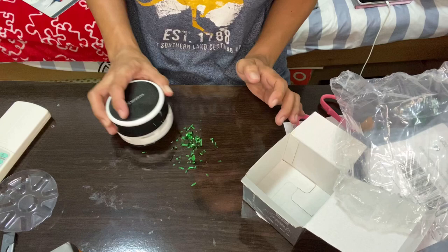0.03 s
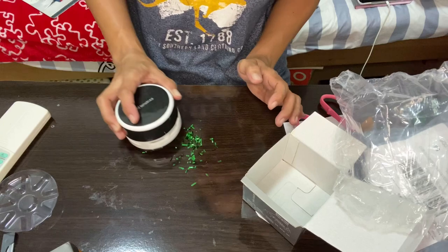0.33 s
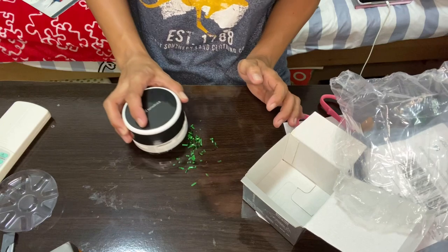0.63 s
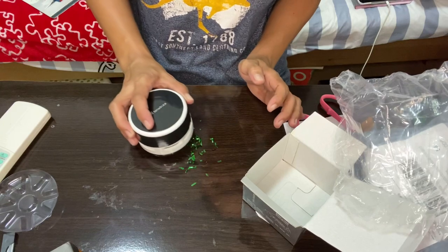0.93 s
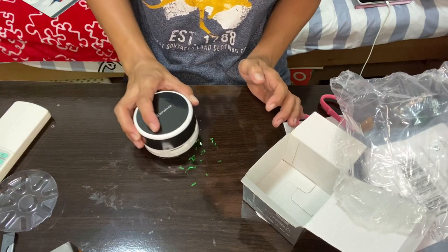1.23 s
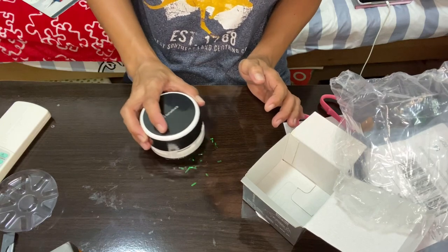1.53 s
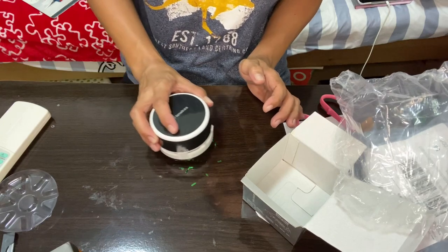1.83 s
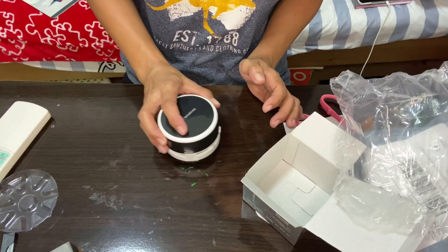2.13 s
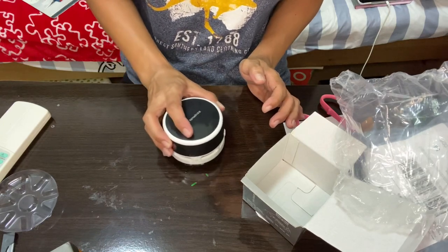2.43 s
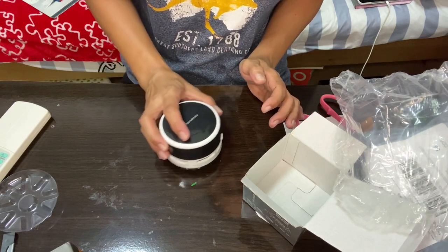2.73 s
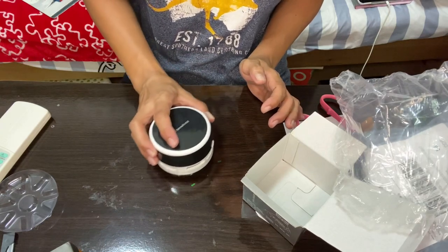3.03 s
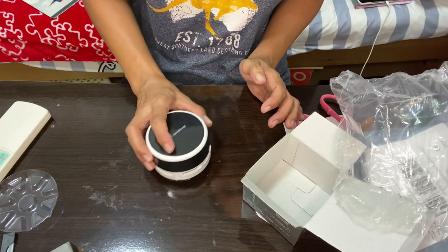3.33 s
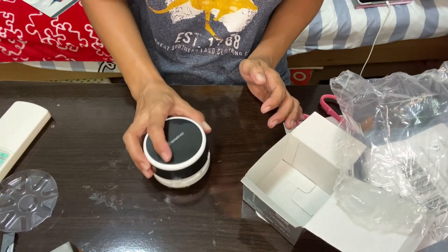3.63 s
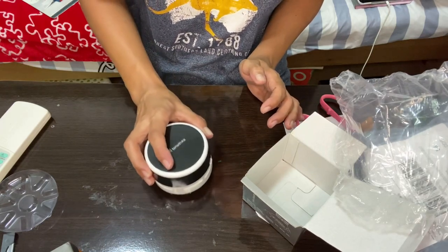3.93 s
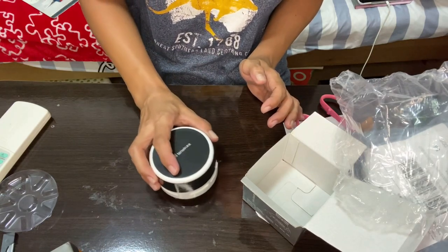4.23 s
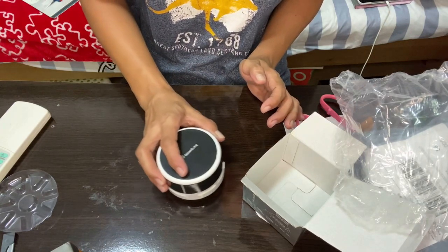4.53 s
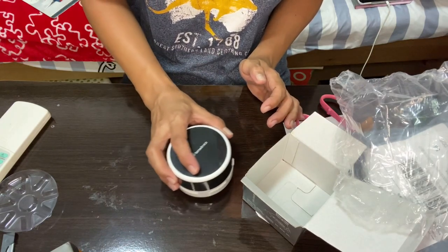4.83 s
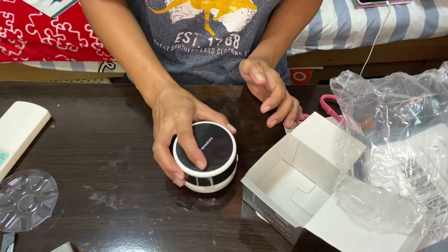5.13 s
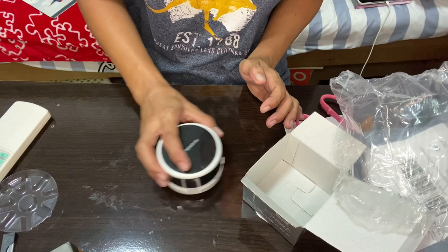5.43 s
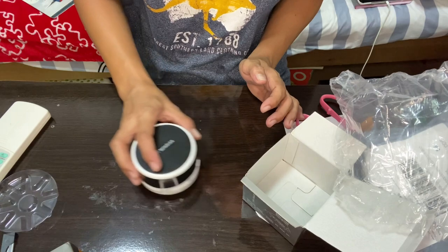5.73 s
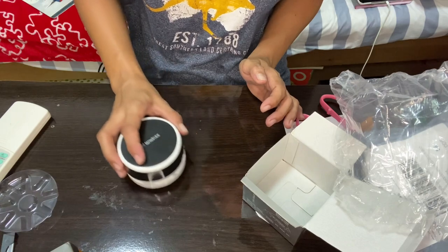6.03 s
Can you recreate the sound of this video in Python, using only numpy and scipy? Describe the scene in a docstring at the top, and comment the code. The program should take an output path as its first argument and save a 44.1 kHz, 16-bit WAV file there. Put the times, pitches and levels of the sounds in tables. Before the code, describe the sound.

A small handheld vacuum hums and whirs steadily across a tabletop, with scraps ticking inside and its rim lightly scuffing and knocking.

```python
"""A desk vacuum on a wooden table

A palm-sized vacuum cleaner spins up and is pushed over a table, close to a phone.
Its six-blade fan hums and blows air through a plastic shell while the motor brushes buzz.
The rim scuffs and knocks on the table, and scraps rattle up the intake and tick against the dust cup.
At the very end the cleaner gives a low groan."""
import sys
import numpy as np
from scipy import signal
from scipy.fft import rfft, irfft, next_fast_len
from scipy.io import wavfile
from scipy.ndimage import map_coordinates

SR = 44100
rng = np.random.default_rng(int(sys.argv[2]) if len(sys.argv) > 2 else 0)


def wav_out(sig):
    """Save sig, one row per channel (or a flat mono array), as 16-bit PCM at SR to the path in sys.argv[1]."""
    wavfile.write(sys.argv[1], SR, np.round(np.clip(np.atleast_2d(sig).T, -1, 1) * 32767).astype(np.int16))


N = 268216
T = np.arange(N) / SR
TOP_HZ = 9600  # the highest pitch the phone picks up
PUSH_START_S, PUSH_M_PER_S = .5, .0336  # the hand pushes at a steady speed

# All levels in the tables are relative: the functions turn them up or down in the mix.
# The cleaner coming on. Each row: time in seconds, level in dB.
SPIN_UP = [(.034, -73), (.037, -10), (.075, -1.5), (.115, 3), (.15, 5.5)]
# The fan's tones; number 6 is the blade tone. Each row: multiple of the shaft speed, level in dB.
FAN_TONES = [(3, -23.5), (5, -23.5), (6, 0), (9, -16), (12, -24)]
# The blade tone shifts sideways as the cleaner moves. Each row: time in seconds, left minus right in dB.
BLADE_PAN = [(.15, 5), (1.2, 1.3), (2.2, 1), (2.8, 3), (4.8, -3.5), (5.3, -1), (6, 0.5)]
# The buzz of the motor brushes. Each row: pitch in Hz, level in dB of the tones near it.
BRUSH_BUZZ = [(2600, -72), (4000, -78), (5500, -73), (6600, -75.5), (7300, -103), (8300, -103),
              (8800, -79.5), (9400, -78.5)]
# The unbalanced rotor thrums through the table. Each row: time in seconds, level in dB.
THRUM = [(0.1, -65.5), (0.45, -62), (1.24, -85), (1.31, -66), (1.43, -74.5), (2.5, -60), (2.58, -76),
         (2.82, -64.5), (3.41, -75.5), (4.87, -74), (5.04, -62), (5.34, -87), (5.73, -69.5), (6.05, -65)]
# The whine's thin tones. Each row: multiple of the shaft speed (rounded when used), top level in dB,
# time of the swell in seconds, its width in seconds, dB lost away from the swell.
WHINE_TONES = [(31, -65, 3.7, .7, 8), (33, -69.5, 1.5, 1.8, 8.5), (42, -64, 1.3, 0.93, 10.5),
               (43, -66, 4.9, .45, 12.5), (46, -61, 1.95, .5, 12.5), (48, -66, 2.6, 2, 6.5),
               (49, -66.5, 4, 1.9, 6), (54, -62, 2, 1, 5.5), (55, -62.5, 4.85, .52, 14),
               (56, -60, 4.97, .5, 14), (58, -63, 3.4, .5, 9), (60, -66, 3.9, 0.92, 10.5),
               (61, -61.5, 4.25, .35, 11.5), (62, -65.5, 4.6, .35, 8.5), (63, -61.5, 5.5, .4, 7.5),
               (69.1, -68, 4.8, 1.4, 10.5)]
# Swirling air in the fan. Each row: frequency in Hz, level in dB.
AIR_COLOUR = [(15, -31.5), (28, -25.5), (60, -29), (130, -35), (165, -26.5), (205, -11.5), (300, -4),
              (430, -1.6), (620, -0.5), (950, -7.5), (1250, -9.5), (1900, -14), (3500, -16.5), (4600, -24),
              (6200, -25.5), (9500, -36)]
# Peaks and dips of the shell and its vents. Each row: centre in Hz, width in Hz, boost or cut in dB.
SHELL_PEAKS = [(400.5, 19.6, 4.5), (516, 63, -0.5), (632, 27, -4.5), (750, 173, 4), (1120, 50, 2),
               (1200, 63, -1.5), (1455, 138, 2), (1704, 180, 3), (1880, 88, -5), (2200, 166, 2),
               (2600, 130, -3.5), (2780, 130, 3.5), (3525, 150, 3), (3700, 84, -2.5), (4250, 110, 3),
               (4580, 330, -3.5)]
# Scraps rattle most as the rim meets the pile. Each row: time in seconds, level in dB.
RATTLE_LEVEL = [(.58, -58.5), (.76, -53.5), (1.3, -52.5), (1.9, -54.5), (3.2, -57.5), (4.6, -65.5),
                (6.05, -63)]
# Hard plastic being scratched. Each row: frequency in Hz, level in dB.
PLASTIC_COLOUR = [(300, -21.5), (1200, 3.5), (2300, 4), (3600, 2.5), (6000, 3), (8500, -0.5), (10000, -8)]
# Larger scraps hit the cup. Each row: start in seconds, level in dB, pitch of the struck spot in Hz,
# seconds to fade by 60 dB.
TICKS = [(.4313, -35.5, 6000, .014), (.564, -37, 6500, .022), (.652, -39, 8000, .025),
         (.736, -36, 4000, 0.022), (.826, -38, 4000, .025), (.8365, -38, 4000, .02), (.89, -40, 5300, .015),
         (.9115, -37, 3000, .015), (1.124, -35, 7000, .025), (1.1715, -33.5, 3300, 0.032),
         (1.193, -31, 7300, .018), (1.272, -38, 3500, .02), (1.28, -34.5, 6300, .02),
         (1.36, -34, 5500, .02), (1.371, -35, 3400, .025), (1.5988, -36, 4400, .018),
         (1.653, -34.5, 5500, .02), (1.659, -37, 3500, .025), (1.775, -37, 4000, .018),
         (1.786, -32, 5500, .02), (1.9505, -40, 4200, .018), (1.955, -33.5, 5600, .018),
         (2.3255, -40, 5700, .015), (2.4396, -28.5, 4300, 0.0099), (2.477, -36, 4000, .018),
         (2.538, -40, 9000, .025), (2.5855, -37, 3200, .02), (2.601, -34, 5400, .022),
         (2.767, -34, 5530, .04), (2.8325, -35, 6800, .014), (2.85, -40, 5400, .03),
         (2.957, -34.5, 4000, .016), (3.132, -39, 2300, .015), (3.1435, -35, 4500, .025),
         (3.1665, -36, 4300, .016), (3.319, -39, 2400, .015), (3.46, -36, 4000, .015),
         (3.586, -38, 6000, .016), (3.653, -31, 6000, .022), (4.246, -38, 4800, .015),
         (5.1955, -36, 4400, .022), (5.8845, -36, 3500, 0.02), (5.965, -35.5, 3000, .02),
         (5.991, -37, 3000, .018)]
# The rim's firmest scuffs. Each row: middle in seconds, half-length in seconds, hiss in dB, cup in dB.
FIRM_SCUFFS = [(.145, 0.03, -49.5, -55), (.326, .038, -45, -48), (.68, 0.046, -43.5, -48),
               (.837, .04, -38.5, -36), (.903, 0.028, -42.5, -37), (1.15, 0.05, -46, -53),
               (1.26, 0.063, -41, -48), (1.362, 0.045, -38.5, -35), (1.789, 0.081, -42, -42),
               (2.06, .025, -50, -36), (2.16, 0.049, -47, -36), (2.585, 0.021, -43, -35),
               (2.852, 0.017, -46, -34), (3.115, .025, -52, -38), (3.16, 0.035, -41, -41),
               (3.62, 0.15, -50.5, -51), (4.17, .1, -48.5, -65), (4.245, 0.009, -56, -51),
               (4.42, .018, -42, -41), (5.975, .038, -48, -48)]
# The hollow cup during a scuff. Each row: frequency in Hz, level in dB.
CUP_COLOUR = [(100, -30), (350, -13.5), (700, 8.5), (1000, -2), (1500, -12.5), (2400, -20), (4000, -32.5)]
# The rim judders on the table. Each row: start in seconds, level in dB, favoured pitch in Hz.
KNOCKS = [(.7095, -26.5, 1050), (.741, -28, 740), (.825, -26, 1080), (.892, -26, 800), (.908, -25.5, 1080),
          (1.2355, -24, 720), (1.3295, -26, 1080), (1.346, -31, 700), (1.3605, -25, 720), (1.871, -25, 790),
          (2.1445, -24, 715), (2.168, -27, 715), (2.2645, -29, 790), (2.5715, -26.5, 720),
          (3.5675, -24, 790), (3.638, -24, 680), (5.462, -27, 1000)]
# The notes the cup rings at. Each row: pitch in Hz, level in dB, seconds to fade by 60 dB.
CUP_NOTES = [(646, -1.5, 0.025), (712, 3.5, 0.04), (790, -1.5, 0.033), (864, -4.5, 0.022),
             (1064, -0.5, 0.032), (1490, -7.5, 0.018)]
# The table top, shaken by the sliding rim. Each row: frequency in Hz, level in dB.
TABLE_COLOUR = [(15, -16.5), (30, -10), (70, -7), (130, -2), (170, 5), (260, 2.5), (450, -7.5), (900, -31)]
# How strongly the table rumbles. Each row: time in seconds, level in dB.
RUMBLE_LEVEL = [(.1, -62), (.65, -59), (.95, -60), (1.1, -70.5), (1.6, -71), (1.8, -62.5), (2.45, -58),
                (3.2, -58), (3.9, -61), (4.3, -65.5), (4.9, -69), (5.15, -58), (5.4, -63.5), (5.55, -58),
                (6.05, -58)]
# Air rings in the gap under the rim. Each row: time in seconds, lower pitch in Hz, upper pitch in Hz,
# boost of the lower one in dB.
GAP_PITCHES = [(.1, 1490, 2210, 3.5), (.95, 1490, 2200, 3), (1.35, 1490, 2230, 7), (1.75, 1350, 2240, 7),
               (2.3, 1360, 2200, 4.5), (2.8, 1370, 2050, 6.5), (3.2, 1400, 2170, 5.5), (3.8, 1410, 2310, 2),
               (4.7, 1410, 2320, 1.5), (5.35, 1440, 2260, 2.5), (5.75, 1610, 2200, 3)]
# How alike the two microphones sound. Each row: frequency in Hz, likeness from 0 to 1.
MIC_LIKENESS = [(60, 0.76), (350, 0.64), (560, 1), (950, 0.77), (1400, 0.52), (2200, 0.58), (3000, 0.2),
                (3700, .6), (4400, 0.99), (5500, 0.74), (6700, 0.76), (7500, 1), (8200, 1), (9500, 0.15)]
# How far the wave at the left microphone is ahead. Each row: frequency in Hz, lead in radians.
LEFT_LEAD = [(100, 0), (750, 0.46), (1300, -0.6), (1700, -1.64), (2400, -0.5), (3500, -.5), (4500, 0),
             (5300, 0.82), (6500, 2), (7450, 3.5), (8300, 3), (9500, 5)]


def motor(turns, shaft_hz, hum_db):
    """The fan blades hum, the brushes buzz in many high tones, and the rotor shakes the table."""
    hum = 0
    pan_db, = curves(BLADE_PAN)
    for multiple, db in FAN_TONES:
        if round(multiple) == 6:  # six blades pass on every turn
            tone = shaft_tone(turns, shaft_hz, 6, drift_db=.64, drift_rate=7)
            tone = tone * amp([pan_db / 2, -pan_db / 2])
        else:
            tone = shaft_tone(turns, shaft_hz, round(multiple), drift_db=2.5, drift_rate=6)
        hum = hum + amp(db) * tone
    buzz = 0
    whine_multiples = [round(row[0]) for row in WHINE_TONES]
    for multiple in np.setdiff1d(range(30, 106), whine_multiples):
        db = at_pitch(BRUSH_BUZZ, multiple * shaft_hz) + rng.standard_normal() - 2.1
        buzz = buzz + amp(db) * shaft_tone(turns, shaft_hz, multiple, drift_db=3.5, drift_rate=1.8)
    thrum_db, = curves(THRUM)
    contact_db, = curves(RUMBLE_LEVEL)
    thrum = amp(thrum_db - 4.7) * shaft_tone(turns, shaft_hz, 1, drift_db=2, drift_rate=11)
    table_hum = amp(contact_db - 8) * shaft_tone(turns, shaft_hz, 2, drift_db=2, drift_rate=4.3)
    return amp(hum_db) * hum + buzz + thrum + table_hum


def airflow(turns, flow_db, throb=.15, flutter_db=.5):
    """Air rushes through the vents, pulsing slightly with each turn of the fan."""
    pulsing = 1 + throb * np.cos(2 * np.pi * turns)
    rush = through_shell(rng.standard_normal((2, N)) * pulsing, AIR_COLOUR)
    return amp(flow_db + flutter_db * wobble(14)) * rush


def whine(turns, shaft_hz):
    """The motor's spinning contacts beam out thin tones; each swells as its beam sweeps past the phone."""
    out = 0
    for multiple, db, facing_s, width_s, fade_db in WHINE_TONES:
        turned_away = 1 - np.exp(-np.abs((T - facing_s) / width_s) ** 3)
        tone = shaft_tone(turns, shaft_hz, round(multiple), drift_db=.5, drift_rate=3.5)
        out = out + amp(db - 2.5 - fade_db * turned_away) * tone
    return out


def scrap_rattle():
    """Clumps of light scraps rattle up the intake, whirling round the cup in quick bursts."""
    rattle_db, = curves(RATTLE_LEVEL)
    clumps = amp(1.9 * wobble(35) + 3 * np.clip(wobble(130), -2, 1.5))
    return amp(rattle_db + 1) * through_shell(clumps * grains(per_second=1100), PLASTIC_COLOUR)


def scrap_ticks(rise_s=.0003, spot_db=9, spot_octaves=.41, bright_db=4, size=2048):
    """A scrap hits the cup: a short crack of plastic, strongest near the pitch of the struck spot."""
    out = np.zeros((2, N))
    t, hz = T[:size], np.fft.rfftfreq(size, 1 / SR)
    plastic_db = at_pitch(PLASTIC_COLOUR, hz) + bright_db * hz / TOP_HZ
    for start_s, db, spot_hz, fade_s in TICKS:
        colour = amp(plastic_db + spot_db * bump(np.log2((hz + 1) / spot_hz), spot_octaves))
        noise = rfft(rng.standard_normal((2, size)))
        crack = irfft((noise * colour * mic_gains(hz)).sum(axis=1))
        shape = (1 - np.exp(-t / rise_s)) * amp(-60 * t / fade_s)
        burst = unit(crack * shape) * np.sqrt(np.mean(shape ** 2)) / shape.max()
        out[:, round(start_s * SR):][:, :size] += amp(db) * burst
    return out


def rim_scuffs(judder_db=3):
    """The rim sticks and slips in tiny jerks that hiss on the plastic and sound the hollow cup."""
    hiss_level, cup_level = np.zeros(N), np.zeros(N)
    for middle_s, half_s, hiss_db, cup_db in [*FIRM_SCUFFS, *light_scuffs()]:
        near = slice(*np.searchsorted(T, [middle_s - 2 * half_s, middle_s + 2 * half_s]))
        swell = np.exp(-1.5 * ((T[near] - middle_s) / half_s) ** 2)
        hiss_level[near] += amp(hiss_db + 1.8) * swell
        cup_level[near] += amp(cup_db - 1) * swell
    judder = unit(amp(judder_db * np.clip(wobble(150), -2, 1.5)))
    hiss = judder * through_shell(grains(per_second=3500), PLASTIC_COLOUR)
    cup = through_shell(grains(per_second=5000), CUP_COLOUR)
    return hiss_level * hiss + cup_level * cup


def light_scuffs(per_second=7, half_s=.017, hiss_db=-52.5, cup_db=-48.5, spread_db=2):
    """Rows like FIRM_SCUFFS for small random catches of the rim, stronger where scraps lie under it."""
    count = int(per_second * (T[-1] - PUSH_START_S))
    moments = PUSH_START_S + (np.arange(count) + rng.random(count)) / per_second
    rattle_s, rattle_db = np.transpose(RATTLE_LEVEL)
    grit_db = .3 * (np.interp(moments, rattle_s, rattle_db) - rattle_db.mean())
    levels = [hiss_db, cup_db] + grit_db[:, None] + spread_db * rng.standard_normal((count, 2))
    return [(middle_s, half_s, *pair) for middle_s, pair in zip(moments, levels)]


def rim_knocks(rise_s=.0011, scatter_db=2, favour_db=9, favour_width_hz=70):
    """A judder of the rim rings the cup; the place of contact decides which notes are loudest."""
    out = np.zeros(N)
    t = T[:SR // 8]
    for start_s, db, favoured_hz in KNOCKS:
        ring = 0
        for hz, note_db, fade_s in CUP_NOTES:
            boost_db = favour_db * bump(hz - favoured_hz, favour_width_hz) + rng.normal(0, scatter_db)
            note = np.sin(2 * np.pi * hz * rng.normal(1, .018) * t)
            ring = ring + amp(note_db + boost_db - 60 * t / fade_s) * note
        ring = ring * (1 - np.exp(-t / rise_s))
        out[round(start_s * SR):][:len(t)] += amp(db) * ring / np.abs(ring).max()
    return out


def groan(start_s=6.045, rise_s=.008, hz=268, roughness=.25):
    """A low, slightly rough tone sets in as the cleaner is dragged back."""
    swell = (1 + np.tanh((T - start_s) / rise_s)) / 2
    tone = np.sqrt(2) * np.sin(2 * np.pi * hz * T + roughness * wobble(90))
    return amp(-39) * swell * tone


def table_rumble():
    """The firmer the rim's contact, the more the table top rumbles."""
    contact_db, = curves(RUMBLE_LEVEL)
    return amp(contact_db) * through_shell(rng.standard_normal((2, N)), TABLE_COLOUR)


def rim_gap(sound, lower_width_hz=55, upper_width_hz=90, upper_db=4.5):
    """Air under the rim boosts two pitches, which wander as the hand tilts and slides the cleaner."""
    hz, times, spectra = signal.stft(sound, SR, nperseg=1024)
    lower_hz, upper_hz, lower_db = curves(GAP_PITCHES, times)
    boost_db = lower_db * bump(hz[:, None] - lower_hz, lower_width_hz)
    boost_db += upper_db * bump(hz[:, None] - upper_hz, upper_width_hz)
    return signal.istft(spectra * amp(boost_db), SR, nperseg=1024)[1][:, :N]


def echoes(sound, count=7, sound_m_per_s=343):
    """A box, arms and furniture throw back the treble; the delays shift as the cleaner slides."""
    treble = filtered(sound, lambda hz: 1 / (1 + (900 / (hz + 1)) ** 6))
    slid_m = PUSH_M_PER_S * np.maximum(T - PUSH_START_S, 0)
    out = np.zeros_like(sound)
    for path_m, stretch, mic_gap_m in rng.uniform([.4, -1.8, -.004], [3, 1.8, .004], (count, 3)):
        for mic in range(2):
            delay_s = (path_m + stretch * slid_m + (mic - .5) * mic_gap_m) / sound_m_per_s
            out[mic] += np.interp(T - delay_s, T, treble[mic], left=0)
    return amp(-8) * out / np.sqrt(count)


def shaft_tone(turns, shaft_hz, multiple, drift_db, drift_rate):
    """A stereo tone at a multiple of the shaft speed; it swells and fades as the hand moves the shell."""
    angle = 2 * np.pi * ((multiple * turns + rng.random()) % 1)
    lead = at_pitch(LEFT_LEAD, multiple * shaft_hz) * np.array([[.5], [-.5]])
    return np.sqrt(2) * amp(drift_db * wobble(drift_rate)) * np.sin((angle + lead).astype(np.float32))


def grains(per_second, spread_db=2):
    """Two rows of tiny impacts at shared random moments, a few stronger than the rest."""
    strength = np.minimum(rng.exponential(size=N), 3.3)
    hits = rng.random(N) < per_second / SR
    return unit(amp(spread_db * strength) * hits * rng.standard_normal((2, N)))


def through_shell(noise_pair, colour):
    """Shape two noises by a colour table and the plastic shell, giving stereo of strength 1."""
    def response(hz):
        shell_db = sum(db * bump(hz - centre, width) for centre, width, db in SHELL_PEAKS)
        return amp(at_pitch(colour, hz) + shell_db) * mic_gains(hz)
    return unit(filtered(noise_pair, response).sum(axis=1))


def mic_gains(hz):
    """How two noises reach the two microphones: one is shared, the other arrives with opposite signs."""
    angle = np.arccos(np.clip(at_pitch(MIC_LIKENESS, hz), 0, 1)) / 2
    shared, opposed = np.cos(angle), np.sin(angle)
    lead = np.exp(.5j * at_pitch(LEFT_LEAD, hz))
    return np.array([[lead * shared, lead * opposed], [shared / lead, -opposed / lead]])


def amp(db):
    """Turn decibels into a number to multiply by."""
    return 10 ** (np.asarray(db) / 20)


def unit(x):
    """Scale to an average strength (rms) of 1."""
    return x / np.sqrt(np.mean(x ** 2) + 1e-20)


def bump(distance, width):
    """A smooth hill: 1 at the centre, half as high one width away."""
    return 1 / (1 + (distance / width) ** 2)


def at_pitch(rows, hz):
    """Read between a table's frequencies, giving each octave equal room."""
    row_hz, values = np.transpose(rows)
    return np.interp(np.log(hz + 1), np.log(row_hz + 1), values)


def curves(rows, times=T):
    """Join a table's moments with straight lines: one curve for each column after the time."""
    row_s, *columns = np.transpose(rows)
    return [np.interp(times, row_s, column) for column in columns]


def wobble(rate):
    """A smooth curve through `rate` random points a second."""
    coarse = T[::64]
    points = rng.standard_normal(int(T[-1] * rate) + 4)
    return np.interp(T, coarse, map_coordinates(points, [coarse * rate]))


def filtered(x, response):
    """Change each frequency of x by the gain that response(hz) gives."""
    size = next_fast_len(N + SR // 4)
    return irfft(rfft(x, size) * response(np.fft.rfftfreq(size, 1 / SR)), size)[..., :N]


def scene():
    """The motor creeps up to speed, its hum and airflow growing with it, and the cleaner slides along."""
    lag_hz = 4.95 * np.exp(-T / .69)  # how far the shaft is still short of its running speed
    speed_hz = 86.48 - lag_hz + .13 * T + .0348 * wobble(7)
    hum_db, flow_db = -40.6 - 1.05 * lag_hz, -41.9 - .7 * lag_hz
    turns, typical_hz = np.cumsum(speed_hz) / SR, np.median(speed_hz)
    running = amp(curves(SPIN_UP)[0])
    rush = running * (airflow(turns, flow_db) + scrap_rattle() + table_rumble())
    noises = rim_gap(rush + rim_scuffs())
    direct = running * motor(turns, typical_hz, hum_db) + noises + rim_knocks() + scrap_ticks() + groan()
    heard = direct + echoes(direct) + running * whine(turns, typical_hz)
    return heard * amp([[-1.8], [-2.2]])  # the left side is a touch louder


def record(dry):
    """The phone cuts off steeply above its highest pitch."""
    return filtered(dry, lambda hz: 1 / np.sqrt(1 + (hz / TOP_HZ) ** 160))


dry = scene()
out = record(dry)
wav_out(out)
```